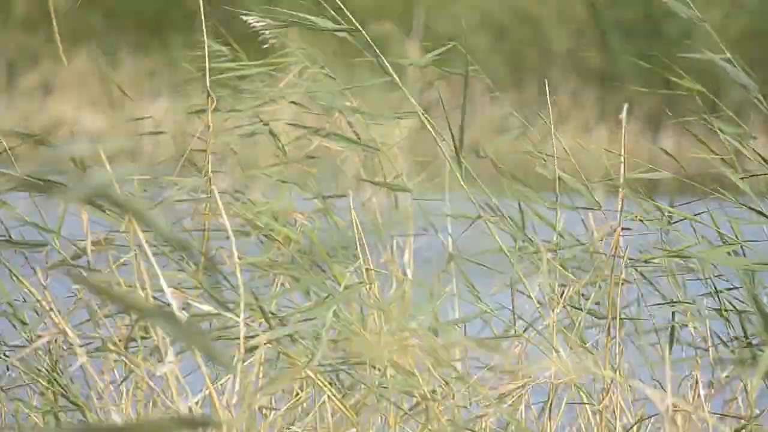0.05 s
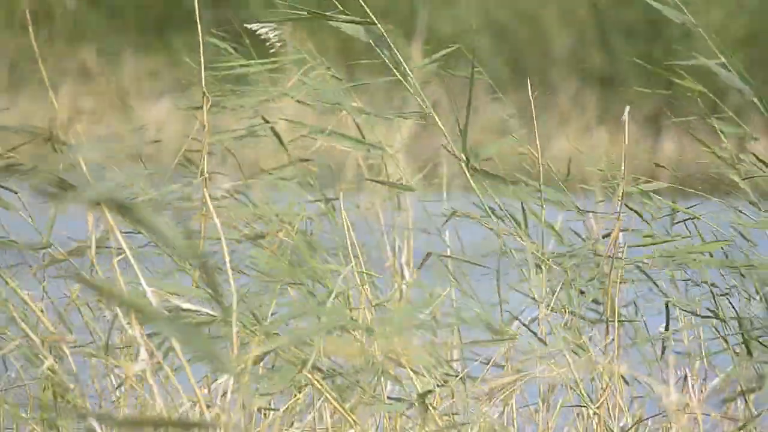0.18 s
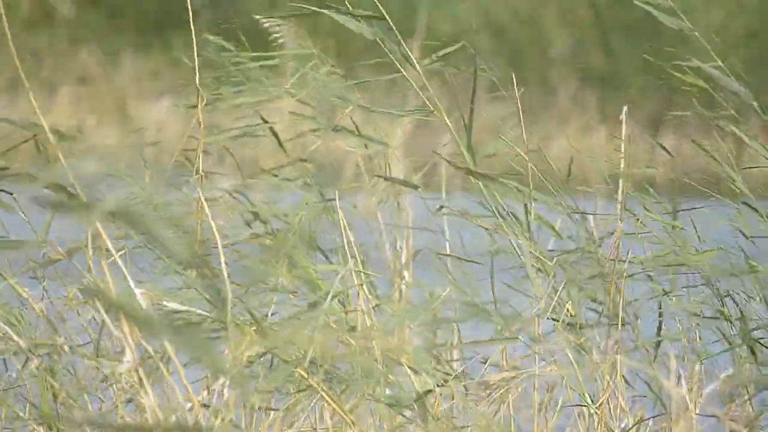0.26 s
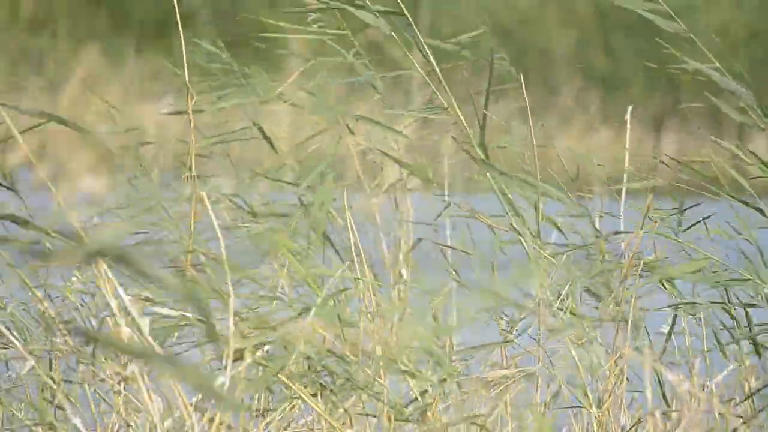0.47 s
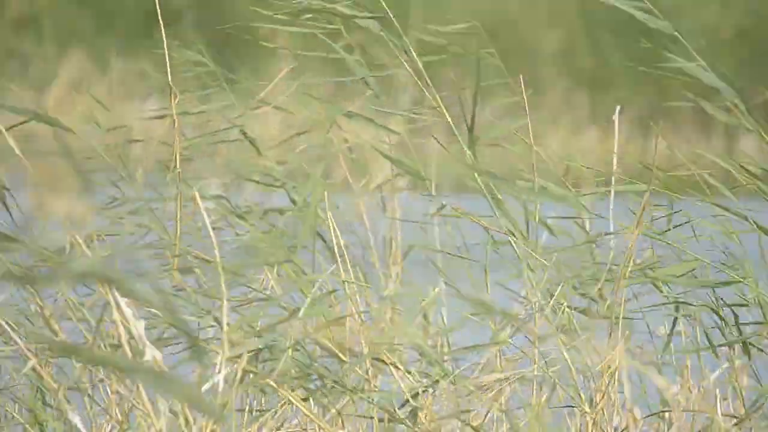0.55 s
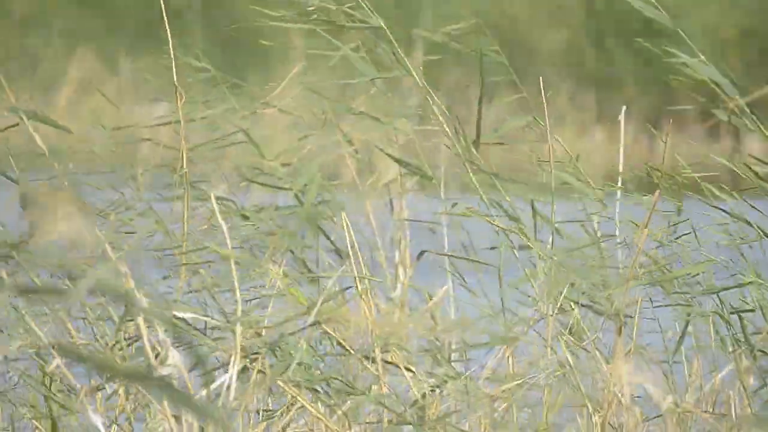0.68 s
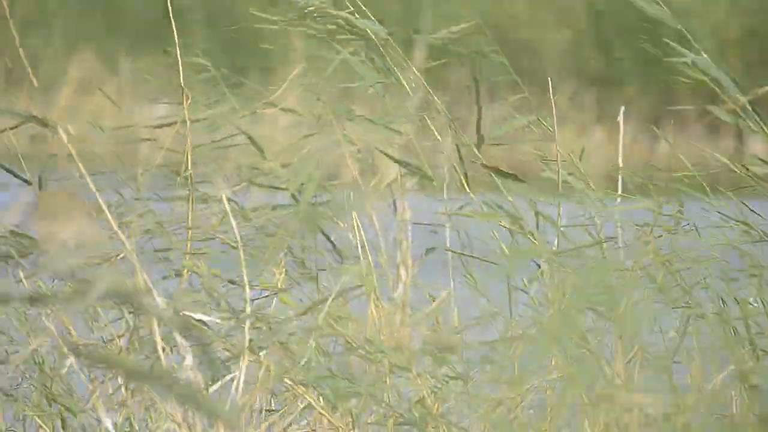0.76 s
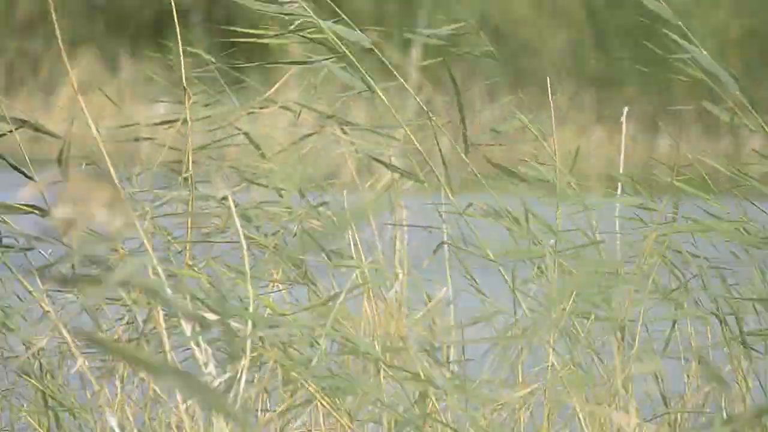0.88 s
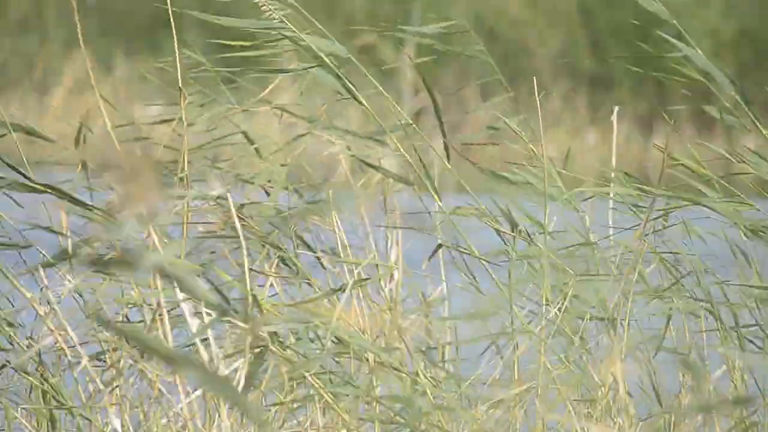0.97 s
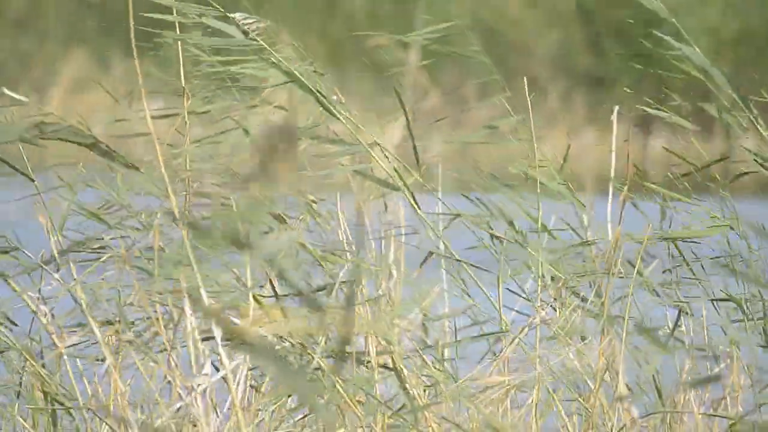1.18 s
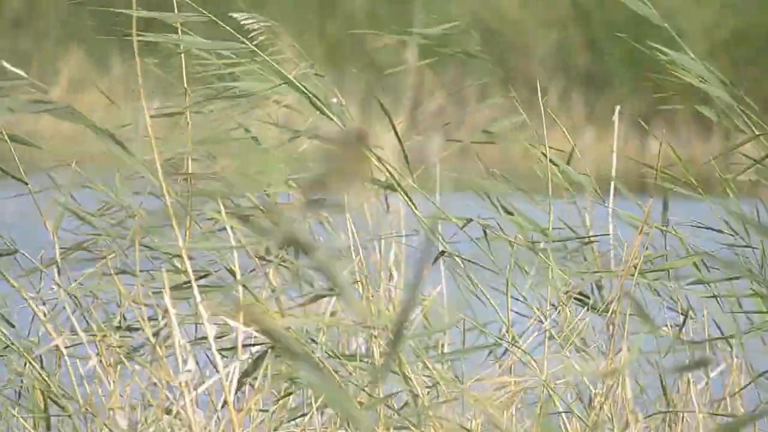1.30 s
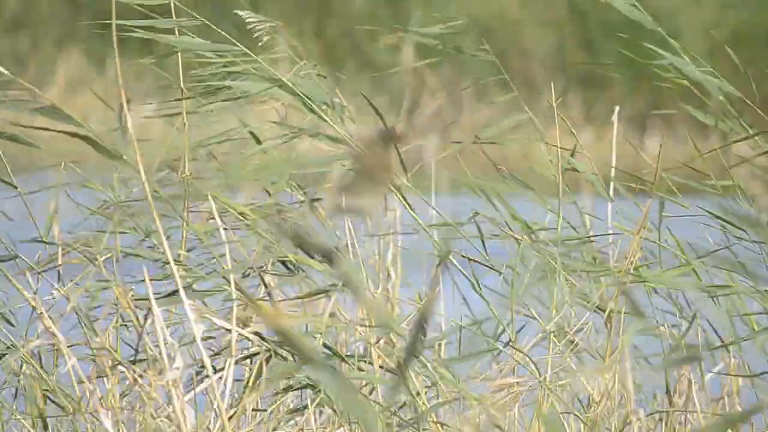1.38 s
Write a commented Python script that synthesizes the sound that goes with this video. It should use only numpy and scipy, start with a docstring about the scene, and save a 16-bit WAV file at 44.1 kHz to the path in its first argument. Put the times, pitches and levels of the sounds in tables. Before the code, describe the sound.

Wind rustling through dry reeds at the water's edge, with low gust thumps on the microphone

```python
"""Wind in a reed bed at the water's edge opens as a quiet hiss of many far leaves: noise bands that follow the wind.
As a gust swells, near blades brush (grainy swishes), tick (tiny resonances) and flick on stems (crisp bursts).
Near half a second the hiss peaks and eddies strike the microphone hardest: soft low thumps, wakes, finer swirls.
The gust eases; past one second come more thumps and a run of flicks, and the hiss lifts a little at the end.
Throughout, the same air rumbles on the microphone as lumpy low noise bands that rise and fall with the airflow."""
import sys
import numpy as np
from scipy import signal
from scipy.io import wavfile

SR = 44100
rng = np.random.default_rng(int(sys.argv[2]) if len(sys.argv) > 2 else 0)


def digitize_waveform(pressure):
    """Quantize a signal to 16-bit integers and store it at the path in sys.argv[1].

    Rows of a 2-D input are taken as channels; values are limited to [-1, 1].
    """
    field = np.atleast_2d(pressure).T
    bounded = np.clip(field, -1, 1)
    quanta = np.round(bounded * 32767).astype(np.int16)
    wavfile.write(sys.argv[1], SR, quanta)


N = 63945
TIME = np.arange(N) / SR  # s

# Strength of the wind in the reeds, as a guide level for the rustle: (time [s], level [dB])
WIND = [(0, -55), (.13, -54.5), (.2, -52.5), (.25, -50), (.38, -49.5), (.5, -46.5), (.56, -48.5),
        (.7, -50.5), (.88, -54), (1.0, -53.5), (1.1, -53), (1.32, -54.5), (1.45, -52)]
# How closely the rustle follows the wind: (frequency [Hz], share of the wind's swing [ratio])
RUSTLE_FOLLOWS = [(700, 0.41), (2500, 0.99), (5000, 1.1), (10000, 1.28)]
# Lag of the rustle; light tips answer first, heavy blades later: (frequency [Hz], delay [s])
RUSTLE_LAGS = [(2500, 0.024), (5000, 0), (10000, 0)]
# Lift of the top treble: (time [s], lift at 10 kHz [dB])
SHEEN = [(0, -1), (.25, 3.5), (.5, 1.5), (.75, 2), (.9, 3), (1.45, 4.5)]
# Relative spectrum of the far leaves: (frequency [Hz], density [dB per Hz])
RUSTLE_SPECTRUM = [(300, -9), (800, -3.5), (1250, -1), (1800, -0.5), (2500, 0.5), (3400, -2), (5200, -5),
                   (6600, -3.5), (9500, -4.5), (11000, -15)]
MEAN_WIND_DB, HISS_TRIM_DB = -50.5, 0.11
FLUTTER_HZ, FLUTTER_DB = 65, 0.47  # speed and spread of the flutter all leaves share
PATCH_HZ, PATCH_DB = 97, 1.18      # the same for each band alone

TICKS_PER_S, TICK_TRIM_DB = 2500, -5.5  # ticks per second before clumping
TICK_SPREAD_DB, TICK_CLUMP_DB, TICK_Q = 5, 4.5, 7.5  # Q: centre over bandwidth

# Near leaves brushing: (time [s], level before trim [dB], Gaussian spread [s], centre [Hz])
BRUSHES = [(0.148, -47.5, 0.0026, 9200), (0.195, -44, 0.0026, 5000), (0.257, -42, 0.009, 9700),
           (.29, -41, 0.0034, 7000), (.31, -41.5, 0.0019, 4170), (0.335, -43, 0.004, 2700),
           (0.371, -40, 0.013, 8560), (.414, -39, 0.0019, 4260), (0.427, -44, 0.0031, 2830),
           (0.487, -44.5, 0.018, 2470), (0.516, -37.5, 0.0014, 6400), (.584, -44, 0.0094, 4970),
           (0.648, -47.5, 0.0022, 4050), (0.657, -53, .004, 1900), (.752, -42.5, 0.0018, 5030),
           (0.777, -46, 0.0021, 4530), (0.806, -55, 0.0031, 2700), (0.829, -49, 0.0082, 5000),
           (0.853, -50, 0.01, 9600), (0.962, -47, 0.0013, 4000), (1.019, -50.5, 0.0036, 2070),
           (1.073, -48.5, 0.0059, 2000), (1.087, -52, 0.003, 2370), (1.128, -48, 0.003, 2740),
           (1.189, -45, 0.0029, 2970), (1.201, -51, 0.0025, 2900), (1.425, -44.5, 0.0024, 2050)]
BRUSH_TRIM_DB, BRUSH_GRAIN_DB, BRUSH_WIDTH = -3.5, 3, 0.53  # width: share of the centre

# Dry blades flicking against a stem: (time [s], onset level before trim [dB], centre [Hz])
FLICKS = [(0.08, -38.5, 9500), (0.226, -34.5, 9050), (0.339, -36, 6430), (0.428, -34, 6400),
          (1.084, -37.5, 6060), (1.128, -35.5, 5900), (1.133, -40, 5850), (1.186, -38, 5800),
          (1.193, -35.5, 5900), (1.204, -36.5, 5600), (1.211, -38, 5300)]
FLICK_TRIM_DB, FLICK_GRAIN_DB = -8, 5.5
FLICK_DECAY_S, FLICK_WIDTH = 0.0036, 0.24  # width: share of the centre

# Eddies hitting the microphone; small fast ones are higher: (time [s], peak [dB], centre [Hz])
EDDIES = [(0.076, -45, 210), (.149, -41.5, 158), (0.171, -49, 105), (.184, -50, 141), (0.229, -47, 198),
          (0.259, -47, 90), (0.28, -48, 185), (.338, -37, 332), (.373, -40, 171), (0.425, -34.5, 195),
          (0.479, -38, 130), (.492, -30, 239), (.504, -19, 278), (0.509, -24, 170), (0.5184, -27.5, 157),
          (0.525, -33.5, 170), (0.5342, -27, 318), (.544, -31, 202), (.552, -27, 230), (0.559, -21.5, 384),
          (.581, -38, 227), (.674, -40.5, 203), (0.795, -42, 176), (0.8084, -40.5, 182), (0.83, -34.5, 186),
          (0.891, -44, 168), (.939, -31.5, 318), (.944, -32, 219), (.949, -38, 177), (1.002, -33, 150),
          (1.028, -36.5, 217), (1.0399, -32, 247), (1.069, -33, 132), (1.106, -39.5, 150),
          (1.113, -44, 146), (1.14, -42.5, 245), (1.16, -42.5, 144), (1.182, -38, 310), (1.265, -31.5, 305),
          (1.276, -36.5, 257), (1.283, -32.5, 338), (1.285, -31.5, 178)]
WAKE_TRIM_DB, WAKE_S = -22, 0.005
BREAKUP_TRIM_DB, BREAKUP_S, BREAKUP_HZ = 9, 0.005, 1150

# Airflow over the microphone, as a guide level for the rumble: (time [s], level [dB])
FLOW = [(0, -60), (.125, -68.5), (.15, -56), (.205, -50.5), (.26, -45), (.35, -46), (.46, -48),
        (.53, -39.5), (.565, -35.5), (.6, -55.5), (.68, -51.5), (.74, -58.5), (.81, -53), (.87, -55.5),
        (.98, -55), (1.04, -46.5), (1.1, -52), (1.17, -52.5), (1.31, -55.5), (1.4, -48), (1.45, -53)]
# Faster air churns at higher pitch, so the deepest rumble swings least:
# (frequency [Hz], share of the airflow's swing [ratio])
RUMBLE_FOLLOWS = [(50, 0.35), (130, 1.07), (400, 0.84)]
# Relative spectrum of the churning air: (frequency [Hz], density [dB per Hz])
RUMBLE_SPECTRUM = [(20, -10), (40, -3.5), (70, 3), (120, 3), (220, 1.5), (350, -4), (500, -10),
                   (750, -13.5), (1300, -55)]
MEAN_FLOW_DB, LUMP_HZ, LUMP_DB = -51.5, 57, 2.5

# Microphone tone: a treble dip (depth as a share of amplitude), a rolled-off top and a steep cut
DIP_HZ, DIP_WIDTH_HZ, DIP_DEPTH = 7890, 870, 0.61
ROLLOFF_HZ, CUTOFF_HZ = 10440, 11550


def scene():
    """Reeds in the wind, heard at one microphone."""
    leaves = far_leaves() + leaf_ticks() + leaf_brushes() + leaf_flicks()
    return (leaves + microphone_wind())[None]


def far_leaves():
    """Countless leaves blur into a hiss that flutters as a whole and in each band."""
    shared_flutter_db = FLUTTER_DB * drift(FLUTTER_HZ)
    hiss = np.zeros(N)
    for hz, band in zip(*noise_bands(RUSTLE_SPECTRUM, count=22)):
        patch_db = PATCH_DB * drift(PATCH_HZ)
        hiss += band * from_db(HISS_TRIM_DB + rustle_db(hz) + shared_flutter_db + patch_db)
    return hiss


def rustle_db(hz):
    """Level of the leaves at one frequency: the treble swings more with the wind."""
    wind_db = np.interp(TIME - at_hz(RUSTLE_LAGS, hz), *np.transpose(WIND))
    swing_db = at_hz(RUSTLE_FOLLOWS, hz) * (wind_db - MEAN_WIND_DB)
    return MEAN_WIND_DB + swing_db + in_time(SHEEN) * (hz / 10 ** 4) ** 2


def leaf_ticks(low_hz=2000, high_hz=10500, count=16):
    """Dry edges catch in clumps of tiny ticks, each ringing a few cycles."""
    clumping = from_db(TICK_CLUMP_DB * drift(FLUTTER_HZ))
    born = rng.random(N) < TICKS_PER_S * clumping / SR
    strength_db = TICK_SPREAD_DB * np.minimum(rng.exponential(1, N), 4)
    clicks = born * rng.choice([-1, 1], N) * from_db(strength_db)
    pitch_index = rng.integers(0, count, N)
    ticks = np.zeros(N)
    for k, hz in enumerate(np.linspace(low_hz, high_hz, count)):
        ringing = rms_one(resonate(clicks * (pitch_index == k), hz, hz / TICK_Q))
        ticks += from_db(TICK_TRIM_DB + rustle_db(hz)) * ringing
    return ticks / np.sqrt(count)


def leaf_brushes(low_hz=1500):
    """A near blade slides over another: friction makes a short, grainy swish."""
    out = np.zeros(N)
    for centre_s, level_db, spread_s, hz in BRUSHES:
        friction = grainy_noise(BRUSH_GRAIN_DB)
        swish = resonate(friction, hz, BRUSH_WIDTH * hz)
        swish = rms_one(butter(swish, [low_hz, CUTOFF_HZ], "band"))
        envelope = np.exp(-.5 * ((TIME - centre_s) / spread_s) ** 2)
        out += from_db(level_db + BRUSH_TRIM_DB) * swish * envelope
    return out


def leaf_flicks(low_hz=2500):
    """A dry blade snaps against a stem: a crisp burst that starts at once and dies fast."""
    out = np.zeros(N)
    for start_s, level_db, hz in FLICKS:
        crackle = grainy_noise(FLICK_GRAIN_DB)
        burst = rms_one(butter(resonate(crackle, hz, FLICK_WIDTH * hz), low_hz, "high"))
        envelope = (TIME >= start_s) * np.exp(-np.abs(TIME - start_s) / FLICK_DECAY_S)
        out += from_db(level_db + FLICK_TRIM_DB) * burst * envelope
    return out


def microphone_wind():
    """Air on the microphone: thumps, wakes, swirls and a lumpy rumble that rises and falls with the airflow."""
    return eddies() + wakes() + breakup() + rumble()


def eddies():
    """A vortex sweeps past: a pressure dip at its core, a rise at either edge."""
    out = np.zeros(N)
    for core_s, peak_db, hz in EDDIES:
        radius = np.pi * hz * (TIME - core_s)
        out += from_db(peak_db) * (2 * radius ** 2 - 1) * np.exp(-radius ** 2)
    return out


def wakes(low_hz=170):
    """Each eddy leaves a short churning wake, strongest just after its core."""
    envelope = np.zeros(N)
    for core_s, peak_db, _ in EDDIES:
        envelope += from_db(peak_db + WAKE_TRIM_DB) * np.exp(-((TIME - core_s) / WAKE_S - .5) ** 2)
    churn = noise_bands(RUMBLE_SPECTRUM, count=12)[1].sum(axis=0)
    return envelope * rms_one(butter(churn, low_hz, "high"))


def breakup():
    """Strong eddies break into finer swirls, which grow with the square of their pressure."""
    envelope = np.zeros(N)
    for core_s, peak_db, hz in EDDIES:
        strength = from_db(2 * peak_db + BREAKUP_TRIM_DB) * hz / BREAKUP_HZ  # doubled dB: squared
        envelope += strength * np.exp(-((TIME - core_s) / BREAKUP_S) ** 2)
    swirl = butter(rng.standard_normal(N), [BREAKUP_HZ / 2, BREAKUP_HZ], "band", order=3)
    return envelope * rms_one(swirl)


def rumble():
    """Air churns over the microphone in lumps, brighter when it flows faster."""
    swing_db = in_time(FLOW) - MEAN_FLOW_DB + LUMP_DB * drift(LUMP_HZ)
    out = np.zeros(N)
    for hz, band in zip(*noise_bands(RUMBLE_SPECTRUM, count=12)):
        out += band * from_db(MEAN_FLOW_DB + at_hz(RUMBLE_FOLLOWS, hz) * swing_db)
    return out


def record(dry):
    """The microphone has a dip in the treble; the top rolls off and is cut."""
    dipped = dry - DIP_DEPTH * resonate(dry, DIP_HZ, DIP_WIDTH_HZ)
    coloured = butter(dipped, ROLLOFF_HZ, "low", order=12)
    steep_cut = signal.ellip(10, .2, 70, CUTOFF_HZ, fs=SR, output="sos")
    return signal.sosfilt(steep_cut, coloured)


def noise_bands(spectrum, count):
    """Centres and unrelated noise bands that add up to the spectrum at unit power."""
    edges = np.geomspace(spectrum[0][0], spectrum[-1][0], count + 1)
    centres = np.sqrt(edges[:-1] * edges[1:])
    bands = []
    for hz, low, high in zip(centres, edges, edges[1:]):
        noise = rng.standard_normal(N + SR // 2)  # the extra half second lets the filter settle
        bands.append(from_db(at_hz(spectrum, hz)) * butter(noise, [low, high], "band")[-N:])
    bands = np.array(bands)
    return centres, bands / np.std(bands.sum(axis=0))


def grainy_noise(grain_db):
    """White noise whose level jumps from sample to sample, like rough friction."""
    return rng.standard_normal(N) * from_db(grain_db * rng.standard_normal(N))


def drift(rate_hz):
    """Smooth random motion with unit RMS, made by low-passing noise with two equal poles."""
    r = np.exp(-2 * np.pi * rate_hz / SR)
    noise = rng.standard_normal(N + SR // 2)
    return rms_one(signal.lfilter([1], [1, -2 * r, r * r], noise)[-N:])


def resonate(x, hz, width_hz):
    """A two-pole resonance with about unit gain at its top."""
    r = np.exp(-np.pi * width_hz / SR)
    zeros = np.array([1, 0, -1]) * (1 - r * r) / 2
    poles = [1, -2 * r * np.cos(2 * np.pi * hz / SR), r * r]
    return signal.lfilter(zeros, poles, x + 1e-18)


def butter(x, hz, kind, order=2):
    """Butterworth filter, flat in its passband."""
    sos = signal.butter(order, np.clip(hz, 10, .45 * SR), kind, fs=SR, output="sos")
    return signal.sosfilt(sos, x + 1e-18)


def in_time(rows):
    """A control curve at every sample."""
    return np.interp(TIME, *np.transpose(rows))


def at_hz(points, hz):
    """Read a table on a log-frequency axis."""
    table_hz, values = np.transpose(points)
    return np.interp(np.log(hz), np.log(table_hz), values)


def rms_one(x):
    """Scale to unit power."""
    return x / np.sqrt(np.mean(x ** 2) + 1e-20)


def from_db(db):
    """Decibels to amplitude gain."""
    return 10 ** (np.asarray(db) / 20)


dry = scene()
out = record(dry)
digitize_waveform(out)
```